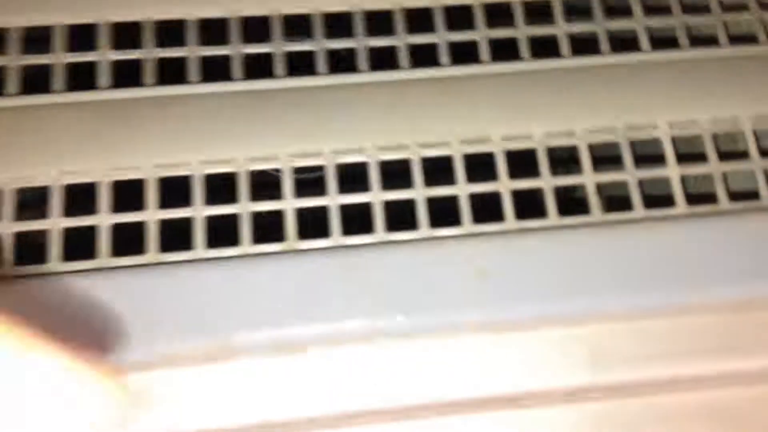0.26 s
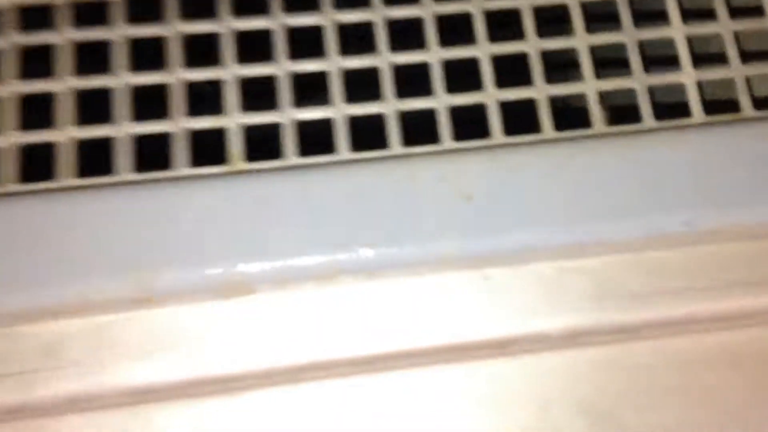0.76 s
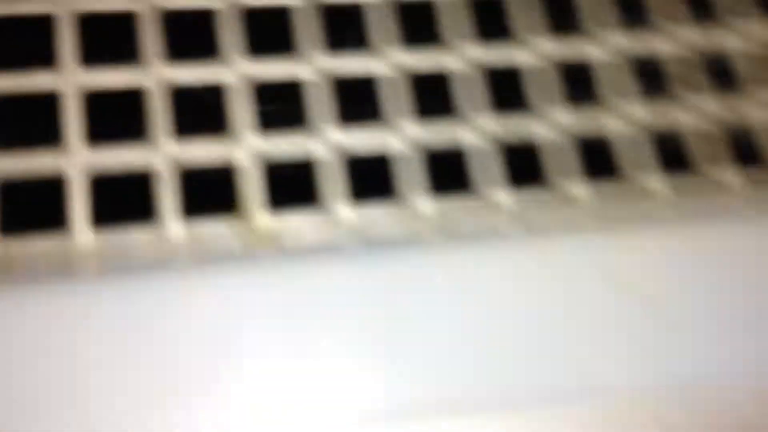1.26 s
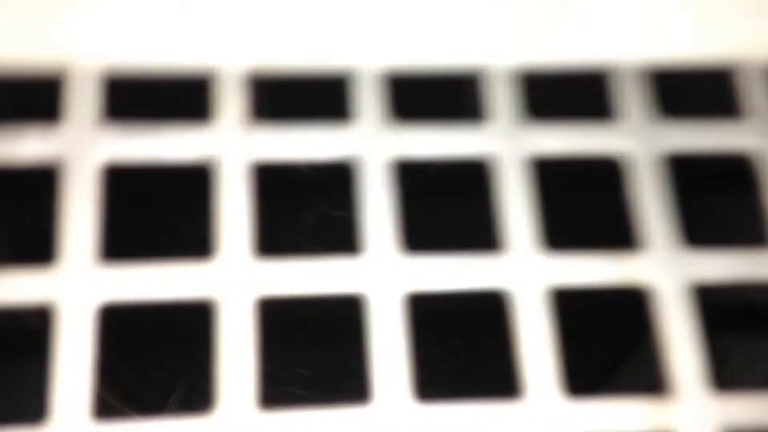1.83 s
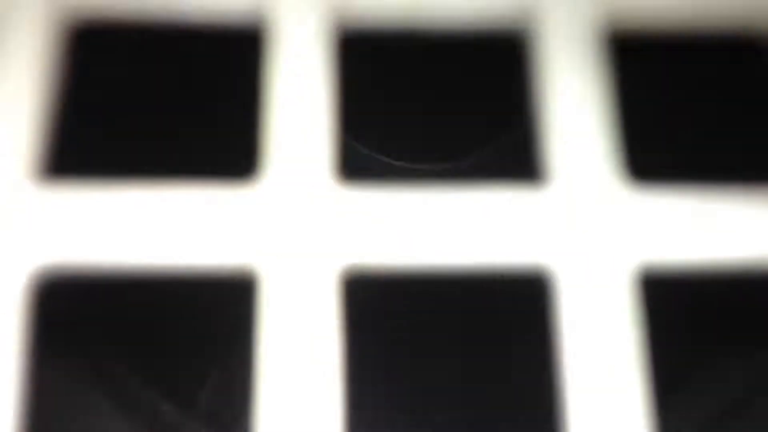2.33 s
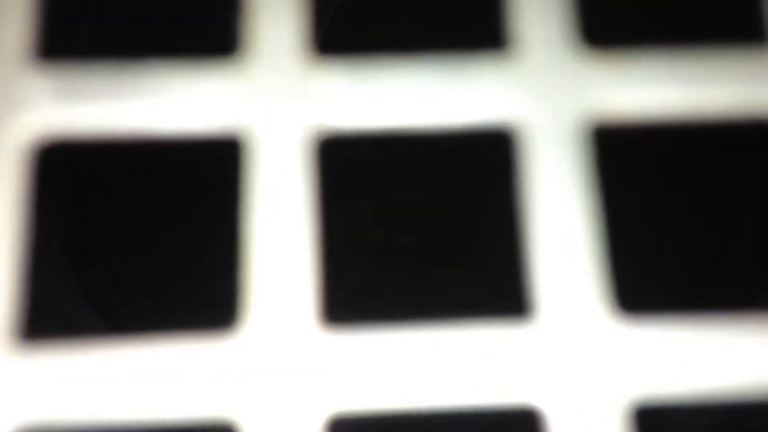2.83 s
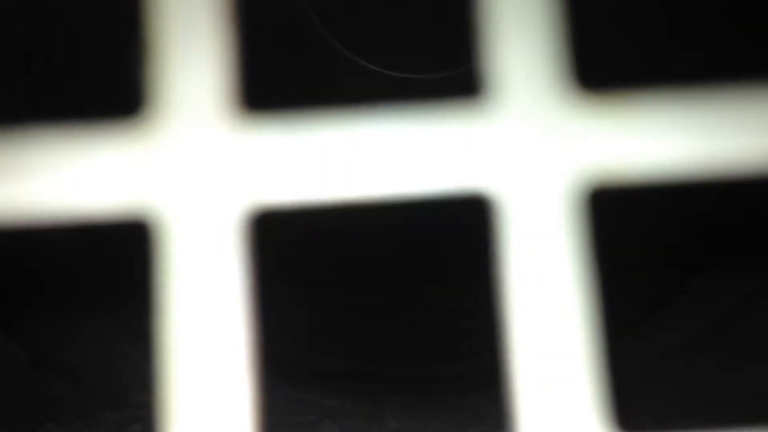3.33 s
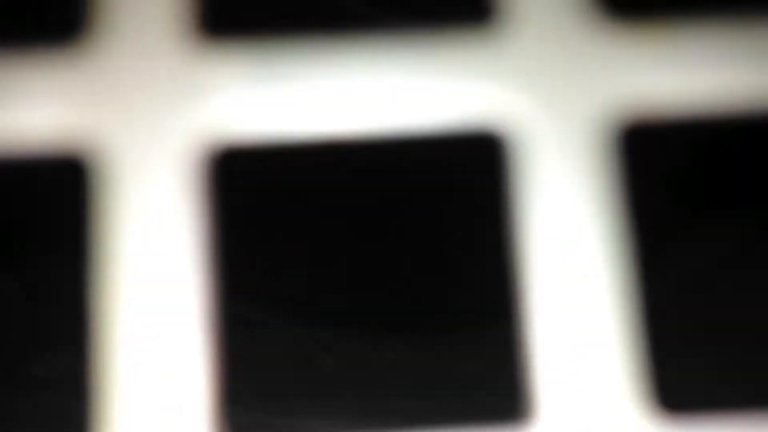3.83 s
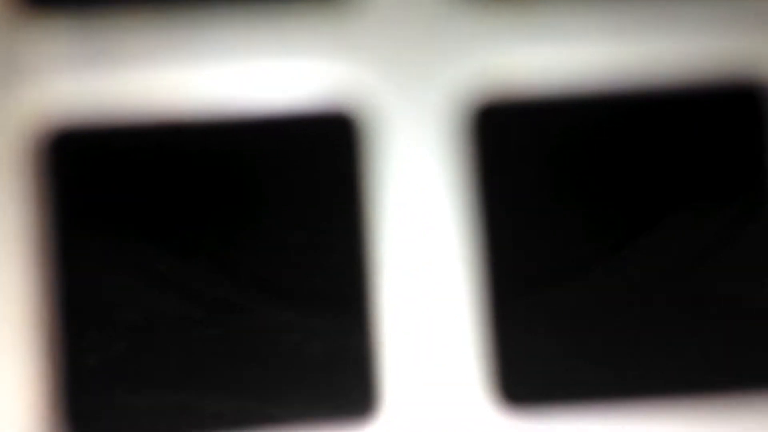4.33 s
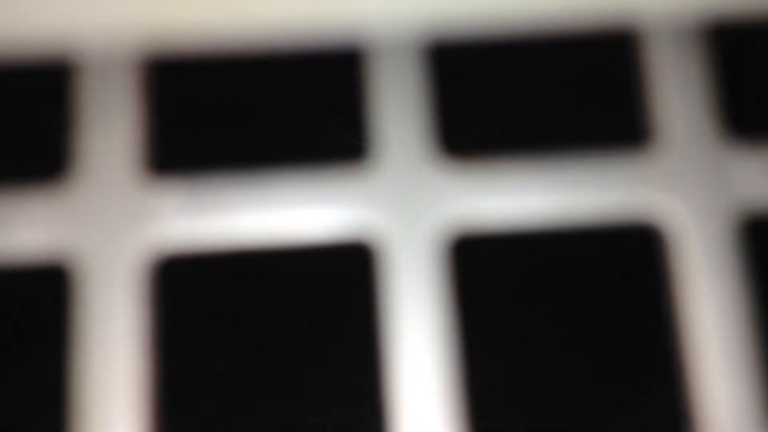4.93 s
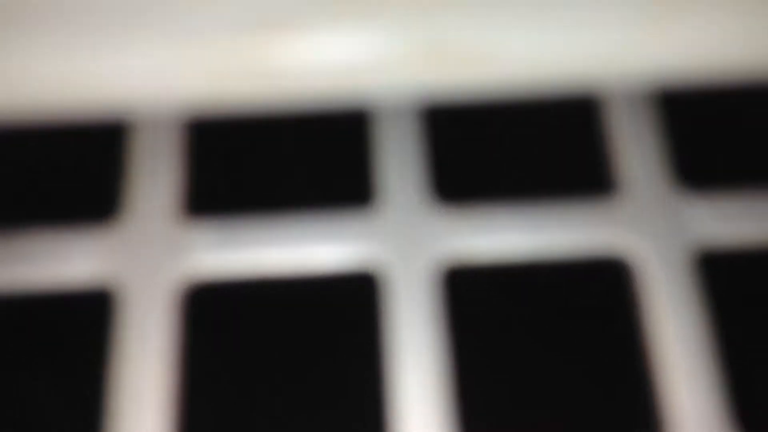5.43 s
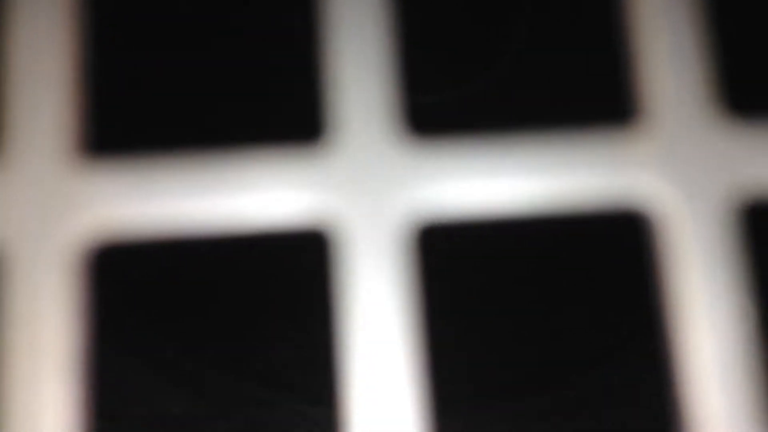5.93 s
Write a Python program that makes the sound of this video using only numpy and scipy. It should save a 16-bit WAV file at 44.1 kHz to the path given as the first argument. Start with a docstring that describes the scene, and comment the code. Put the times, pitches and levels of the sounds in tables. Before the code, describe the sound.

Two large exhaust fans roar and hum with a thin whine, then their airflow buffets the microphone with rumbling, crackling gusts.

```python
"""At a louvred grille with two large exhaust fans running behind it.
From a step back: a steady roar of air, a hum in the duct, thin motor tones and a high whine.
After a second the microphone moves up to the grille and into the outflow, where eddies buffet it:
gusting noise, rumble, a hollow note, snaps, short rips and low thumps.
A limiter holds down the strongest buffets."""
import sys
import numpy as np
from scipy import signal
from scipy.fft import rfft, irfft
from scipy.io import wavfile
from scipy.ndimage import uniform_filter1d, minimum_filter1d

SR = 44100
rng = np.random.default_rng(int(sys.argv[2]) if len(sys.argv) > 2 else 0)


def int16_out(signal):
    """Quantize to a 16-bit WAV file."""
    q = np.round(np.clip(np.atleast_2d(signal).T, -1, 1) * 32767)
    wavfile.write(sys.argv[1], SR, q.astype(np.int16))


N = 272538
T = np.arange(N) / SR
HZ = np.fft.rfftfreq(N, 1 / SR)


def amp(db):
    """Decibels to gain."""
    return 10 ** (np.asarray(db) / 20)


def unit(x):
    """Scales to rms 1."""
    return x / np.sqrt(np.mean(x ** 2) + 1e-20)


def curve(rows, column=1):
    """One column of a table, joined by straight lines in time."""
    rows = np.asarray(rows)
    return np.interp(T, rows[:, 0], rows[:, column])


def colour(points):
    """Gain at every frequency from a few (Hz, dB) points."""
    hz, db = np.transpose(points)
    return amp(np.interp(np.log(HZ + 1), np.log(hz + 1), db))


def noise(gain):
    """Noise of rms 1 with the given spectral shape."""
    return unit(irfft(rfft(rng.standard_normal(N)) * gain, N))


def drift(rate_hz):
    """A smooth random signal that changes up to about the given rate."""
    return noise(1 / (1 + (HZ / rate_hz) ** 2) / (1 + (HZ / (10 * rate_hz)) ** 2))


def steady(x, size):
    """Evens out the level of a noise over about size samples."""
    return x / np.sqrt(uniform_filter1d(uniform_filter1d(x ** 2, size), size) + 1e-6)


def resonance(hz, width_hz):
    """The spectrum of a resonance with peak gain 1."""
    return 1 / (1 + ((HZ - hz) / width_hz) ** 2)


def resonate(x, hz, width_hz):
    """Passes x through a resonance that follows the curve hz."""
    carrier = np.exp(2j * np.pi * np.cumsum(hz) / SR)
    pole = np.exp(-np.pi * width_hz / SR)
    return 2 * (carrier * signal.lfilter([1 - pole], [1, -pole], x / carrier)).real


def swell(peak_s, half_length_s, rise=1):
    """A smooth bump; rise below 1 quickens the attack and draws out the fall."""
    out = np.zeros(N)
    near = slice(*np.searchsorted(T, [peak_s - .1, peak_s + .1]))
    u = (T[near] - peak_s) / half_length_s
    out[near] = np.exp(-np.where(u < 0, u / rise, u * rise) ** 2)
    return out


def snap(impulses, leak_hz=400, corner_hz=1700, top_hz=5600):
    """Turns impulses into sudden pressure steps that leak away within a millisecond."""
    leak = 1j * HZ / (1j * HZ + leak_hz)
    shape = leak / (1 + 1j * HZ / corner_hz) ** 2 / (1 + (HZ / top_hz) ** 6)
    return irfft(rfft(impulses) * shape, N) / abs(irfft(shape, N)).max()


# One scuff on the way up to the grille: peak_s, level_db, half_length_s
SCUFF = (1.18, -48, .022)

def scuff():
    """A brief, faint brush of treble."""
    peak_s, level_db, half_length_s = SCUFF
    treble = noise(colour([(2000, -12), (7000, 2), (12000, 0), (15000, -3)]))
    return amp(level_db) * swell(peak_s, half_length_s) * treble


# One digital click in the signal: start_s, level_db
DIGITAL_CLICK = (5.284, -8)

def digital_click(decay_s=0.00067):
    """One thin, sharp digital click that dies away at once."""
    start_s, level_db = DIGITAL_CLICK
    return amp(level_db) * (T >= start_s) * np.exp(-abs(T - start_s) / decay_s)


# The fans as heard along the microphone's path, in relative levels: time_s, roar_db, whine_db
FAN_PATH = [(0, -52.5, -43.5), (0.6, -53, -46), (1.09, -53, -45.5), (1.14, -56, -48), (1.26, -59.5, -52),
            (1.34, -56, -50.5), (1.6, -57.5, -47.5), (2.0, -58, -50.5), (2.45, -61, -48.5),
            (2.85, -61.5, -52), (3.2, -57.5, -48.5), (3.7, -59, -50), (4.15, -61.5, -47.5),
            (4.45, -60.5, -49.5), (5.0, -57.5, -47.5), (5.08, -63, -53.5), (5.5, -57.5, -49.5),
            (5.8, -62.5, -52), (6.18, -66, -54)]

def fans():
    """All that comes from the fans; roar and tones fade as the microphone turns into the grille."""
    reach = amp(curve(FAN_PATH))
    whine_gain = amp(curve(FAN_PATH, column=2))
    tone_gain = (reach / reach[0]) ** 0.92  # the tones fade a little less than the roar
    return whine_gain * whine() + tone_gain * motor_tones() + duct_hum() + reach * roar()


# The whine from a step back and from close to the grille: pitch_hz, width_hz, far_db, close_db
WHINE_LINES = [(11145, 30, -8, -18), (11310, 40, -3, -14), (11375, 35, -12, -7), (11430, 330, 0, -3),
               (11455, 35, -7, -14), (11513, 30, -10, -3), (11680, 70, -13, -9), (11970, 170, -14, -8),
               (12340, 35, -26, -24), (12435, 35, -26, -28)]

def whine(turn_s=3, turn_length_s=.6):
    """Fuzzy high lines, likely the motor drive; their balance shifts as the microphone moves in."""
    band = resonance(11600, 560) ** .5 / (1 + (HZ / 12550) ** 100)
    close = np.clip((T - turn_s) / turn_length_s + .5, 0, 1)
    out = np.zeros(N)
    for pitch_hz, width_hz, far_db, close_db in WHINE_LINES:
        level_db = far_db + (close_db - far_db) * close
        out += amp(level_db) * noise(band * resonance(pitch_hz, width_hz))
    return unit(out)


# The motors behind the grille, from where the microphone starts: pitch_hz, level_db
MOTOR_TONES = [(501, -52), (894, -58), (1028, -54), (1168, -53), (1427, -55), (1690, -52), (2283, -59),
               (3168, -67), (3391, -68), (3957, -64), (4565, -69), (5325, -69), (5626, -70), (5693, -72),
               (6089, -71), (6218, -75), (7603, -76)]

def motor_tones(waver=0.000905, flutter_db=7.0):
    """Thin motor tones, each wavering in pitch and level in its own way."""
    wander, flutter = drift(5.2), np.tanh(drift(1.8))
    out = np.zeros(N)
    for pitch_hz, level_db in MOTOR_TONES:
        shift = rng.integers(N)
        turns = np.cumsum(pitch_hz * (1 + waver * np.roll(wander, shift))) / SR
        level = amp(level_db + flutter_db * np.roll(flutter, shift))
        out += level * np.sqrt(2) * np.sin(2 * np.pi * turns)
    return out


# The duct's hum along the microphone's path: time_s, relative_db
HUM_PATH = [(0, -15), (.15, -24.5), (.27, -17), (.42, -25), (.62, -21), (.73, -17.5), (.86, -32),
            (1.08, -25), (1.25, -38), (2.2, -25.5), (3.3, -26.5), (3.8, -19.5), (4.2, -18.5), (4.55, -22.5),
            (4.9, -19), (5.6, -21.5), (6.18, -26.5)]

def duct_hum(pitch_hz=140, width_hz=30, tone_db=-9.0, boom_db=0.5, throb_db=2.0, throb_hz=7):
    """The blade-passing tone, half buried in air that booms in the duct; it throbs unevenly."""
    turns = np.cumsum(pitch_hz * (1 + .03 * drift(13.4))) / SR
    tone = np.sqrt(2) * np.sin(2 * np.pi * turns)
    level = amp(curve(HUM_PATH) + throb_db * np.tanh(drift(throb_hz)))
    boom = steady(noise(resonance(pitch_hz, width_hz)), size=4000)
    return level * (amp(tone_db) * tone + amp(boom_db) * boom)


# The fans' rush of air in front of the grille: frequency_hz, relative_db
ROAR_COLOUR = [(25, -17), (42, -2), (60, -5), (100, -9.5), (170, 0.5), (300, -11), (480, -45), (750, -21.5),
               (1130, -22), (1290, -24), (1480, -21), (2400, -25.5), (2750, -28), (3400, -30.5),
               (5200, -39), (10500, -50), (12600, -69), (13200, -90), (14000, -115)]
# The notch in the roar as the microphone moves: time_s, centre_hz, depth_share
ROAR_NOTCH = [(0, 2750, 0.4), (1.05, 2850, 0.6), (1.35, 2840, .85), (1.75, 2640, 1), (2.4, 2870, .55),
              (3.0, 2900, 0), (3.35, 2820, 0.4), (3.6, 2050, 0.6), (5.0, 1950, 0.2), (6.18, 1850, 0.1)]

def roar(gain_db=29.5):
    """Broad blade noise; a reflection, likely off the louvres, cuts a moving notch in it."""
    rush = amp(gain_db) * noise(colour(ROAR_COLOUR))
    return rush - curve(ROAR_NOTCH, column=2) * resonate(rush, curve(ROAR_NOTCH), width_hz=440)


# The microphone crosses the gusty edge of the outflow into its core:
# time_s, strength_db, brightness_db, gustiness_db
FLOW_PATH = [(0, -32, -10, 8), (.22, -32.5, -16, -1.5), (.4, -32.5, -9, 0), (.72, -35.5, -3, 3),
             (.84, -26.5, -14, 2), (.94, -30, -14, 8.5), (1.01, -35.5, -4, -2), (1.15, -31.5, -13, -0.5),
             (1.21, -25, -17, 4), (1.5, -27, -13.5, 5), (1.72, -35.5, -2.5, 3), (1.86, -24.5, -9.5, 5),
             (2.16, -25, -6.5, 3), (2.27, -20.5, -10.5, 4.5), (2.4, -23, -6, 2), (2.6, -22, -9, 2.5),
             (2.92, -22.5, -9, -0.5), (3.02, -17.5, -12.5, 0.5), (3.15, -19, -10.5, 2.5),
             (3.3, -22, -9, 1.5), (3.52, -21.5, -12, 4.5), (3.72, -19.5, -9, -1.5), (3.95, -23, -6.5, 0),
             (4.2, -20.5, -6, 2.5), (4.45, -23.5, -9, 0.5), (4.82, -23, -8, 0), (5.02, -23, -9.5, 1.5),
             (5.2, -23.5, -8, 3.5), (5.55, -23.5, -7, -1.5), (5.78, -23, -9, 7), (6.0, -27, -4.5, 2.5),
             (6.18, -25.5, -5, 3)]

def airflow(gust_hz=22.5, lull_db=1.0, lull_lead_s=.011, lull_half_s=.006):
    """The flow's strength, gusts and brightness in dB; it surges at random and slackens before rips."""
    lulls = sum(swell(crest_s - lull_lead_s, lull_half_s) for crest_s, *_ in RIPS)
    surges_db = curve(FLOW_PATH, column=3) * unit(np.tanh(1.9 * drift(gust_hz)))
    gust_db = surges_db - lull_db * (np.minimum(lulls, 1) - np.mean(lulls))
    return curve(FLOW_PATH) + gust_db, gust_db, curve(FLOW_PATH, column=2)


# A hollow note, strongest with the microphone at the outflow's edge: time_s, level_over_flow_db
HOLLOW_PATH = [(0, -6), (1.1, -15), (1.45, 0.5), (2.3, -15.5), (3.08, -9), (3.3, -13), (6.18, -34)]

def hollow_note(strength_db, pitch_hz=524, width_hz=167, wander=0.17, eddy_hz=45, eddy_db=3):
    """The wind hoots faintly in one broad resonance whose pitch wanders."""
    hz = pitch_hz * (1 + wander * np.tanh(drift(9)))
    note = resonate(resonate(rng.standard_normal(N), hz, width_hz), hz, width_hz)
    gusting = unit(amp(eddy_db * drift(eddy_hz)))
    return amp(strength_db + curve(HOLLOW_PATH)) * unit(note) * gusting


def spits(vigour_db, per_s=70, gain_db=-15.0):
    """Countless small snaps on the microphone, more and louder in strong, bright flow."""
    vigour = amp(vigour_db)
    chance = per_s * unit(vigour) ** 2 / SR
    impulses = rng.choice([-1, 1], N) * (rng.random(N) < chance)
    return amp(gain_db) * vigour * unit(snap(impulses))


# Wind rumble on the microphone: frequency_hz, relative_db
RUMBLE_COLOUR = [(10, -27), (25, -43), (40, -8), (60, 11.5), (100, 10), (140, -5.5), (220, -5.5),
                 (500, -73)]
# The rumble along the path, strongest close to the grille: time_s, level_db
RUMBLE_PATH = [(0, -34), (1.0, -26.5), (1.7, -30.5), (3.44, -25), (3.58, -21), (4.4, -23), (4.95, -18.5),
               (6.18, -21)]

def rumble(gust_db, eddies, eddy_db=-0.9):
    """Slow, large eddies rumble; the level rises with each gust and dips a little at each fast eddy."""
    bass = noise(colour(RUMBLE_COLOUR)) * unit(amp(eddy_db * eddies))
    return amp(curve(RUMBLE_PATH) + gust_db) * bass


# Wind noise right on the microphone: frequency_hz, relative_db
BUFFET_COLOUR = [(60, -44), (120, -5.5), (190, 4.5), (300, -1), (570, -4.5), (1000, -13), (1800, -22.5),
                 (3200, -35.5), (5500, -52), (9000, -54), (13000, -95)]

def buffeting(strength_db, bright_db, eddies, gain_db=4.0, eddy_db=3.0, usual_bright_db=-6.0):
    """Turbulence on the microphone: each eddy swells the noise, and bright flow lifts its treble."""
    air = rfft(noise(colour(BUFFET_COLOUR)))
    octave = np.clip(np.log2((HZ + 1) / 400), -2, 4)
    tilt_db = 0.74 * (bright_db - usual_bright_db)  # per octave, over the two octaves above 400 Hz
    out = np.zeros(N)
    for k in range(-2, 5):
        band = irfft(air * np.maximum(1 - abs(octave - k), 0), N)
        out += band * amp(np.clip(k, 0, 2) * tilt_db)
    return amp(strength_db + gain_db) * unit(amp(eddy_db * eddies)) * out


# Large eddies that strike the microphone: start_s, relative_db, pitch_hz
THUMPS = [(0.259, 3, 143), (0.77, 0, 143), (0.941, -4, 202), (1.094, 6.5, 142), (1.192, 1, 204),
          (1.227, -1.5, 263), (1.508, -2.5, 394), (1.563, -1, 102), (1.575, 3, 620), (1.619, -9, 190),
          (1.778, -1, 490), (1.84, 3, 237), (1.907, 4.5, 220), (2.115, -0.5, 151), (2.264, -1.5, 196),
          (2.274, 10, 192), (2.323, -2.5, 93), (3.436, -2, 790), (3.443, -7, 210), (3.555, -1.5, 76.6),
          (4.398, 3, 330), (5.283, -3.5, 219), (5.603, 3, 152), (5.943, 1, 258), (6.029, 0.5, 324)]

def thumps(gain_db=-5.0, rise_cycles=0.78):
    """A large eddy swings the pressure to and fro once or twice."""
    out = np.zeros(N)
    for (start_s, relative_db, pitch_hz), phase in zip(THUMPS, rng.random(len(THUMPS))):
        turns = np.clip((T - start_s) * pitch_hz, 0, 20)
        age = turns / rise_cycles
        envelope = (age * np.exp(1 - age)) ** 2
        out += amp(relative_db) * envelope * np.sin(2 * np.pi * (turns + phase))
    return amp(gain_db) * out


# A rip's body and the fizz at its crest, right on the microphone: frequency_hz, relative_db
RIP_COLOUR = [(60, -3), (230, 15), (600, 5.5), (1500, -9), (2300, -21), (3500, -33), (6000, -59),
              (13000, -95)]
FIZZ_COLOUR = [(300, -26), (850, 10.5), (1500, 10), (2000, 4), (3000, -3), (4500, -19.5), (6500, -49),
               (10000, -40), (13500, -100)]
# Small fast eddies tearing past the microphone, in relative levels:
# crest_s, body_db, half_length_s, crest_db
RIPS = [(0.039, -21, 0.0023, -41), (0.11, -19, 0.002, -42), (0.24, -16.5, 0.0033, -44),
        (0.84, -24, 0.0043, -40), (1.281, -21, 0.0069, -42), (1.312, -15.5, 0.0027, -25.5),
        (1.38, -17.5, 0.0039, -34), (1.441, -27, 0.0023, -44), (1.473, -21, 0.0021, -40),
        (1.578, -13, 0.0067, -29), (1.624, -27, 0.0025, -48), (1.662, -19, 0.0045, -42),
        (1.78, -18.5, 0.0067, -40), (1.789, -23, 0.0017, -33), (1.853, -20, 0.0021, -22),
        (1.915, -15, 0.0036, -28), (1.929, -12.5, 0.0056, -20), (1.938, -20, 0.0045, -42),
        (1.986, -16, 0.0023, -40), (1.994, -23, 0.0017, -39), (2.047, -25, 0.0022, -37),
        (2.09, -12, 0.0066, -19.5), (2.099, -16, 0.0016, -13.5), (2.151, -22, 0.0036, -26),
        (2.231, -16, 0.0053, -26), (2.25, -18, 0.008, -15), (2.295, -7, 0.0011, -15),
        (2.334, -23, 0.003, -21.5), (2.359, -18, 0.0011, -20), (2.515, -11, 0.003, -24),
        (2.538, -13, 0.0026, -19), (2.582, -31, 0.0024, -25), (2.624, -20, 0.0048, -22.5),
        (2.714, -32, 0.0031, -14.5), (2.732, -14.5, 0.0049, -17), (2.816, -29, 0.001, -20),
        (2.907, -18, 0.0018, -16), (2.918, -15, 0.0036, -25), (3.007, -19, 0.0035, -23),
        (3.052, -14, 0.0044, -28), (3.072, -10, 0.0013, -35), (3.122, -16, 0.0037, -30),
        (3.175, -15, 0.0033, -26), (3.216, -13, 0.0024, -34), (3.224, -7.5, 0.002, -18),
        (3.267, -33, 0.0033, -26), (3.352, -14, 0.0073, -17), (3.4345, -13, .002, -8),
        (3.4395, -12, .0032, -9), (3.539, -15, 0.0023, -34), (3.566, -15.5, 0.0027, -35),
        (3.642, -11, 0.0019, -37), (3.7, -14, 0.002, -17), (3.72, -9, 0.0027, -26),
        (3.732, -17, 0.0033, -20), (3.745, -16, .003, -27), (3.842, -16.5, 0.0025, -26),
        (3.857, -11, 0.0037, -32), (3.872, -5, 0.0025, -12), (3.995, -12, 0.0046, -16),
        (4.05, -12, 0.0026, -44), (4.101, -11, 0.0067, -19), (4.117, -13, 0.0024, -18),
        (4.177, -15, 0.0046, -34), (4.217, -18, 0.002, -30), (4.23, -10, 0.0066, -25),
        (4.242, -8, 0.0013, -28), (4.331, -8, .002, -24), (4.397, -17.5, 0.0063, -20.5),
        (4.482, -8.5, 0.0018, -16.5), (4.522, -8, 0.0031, -32), (4.544, -14, .003, -32),
        (4.608, -18, 0.0037, -21), (4.644, -6, 0.0014, -32), (4.685, -15.5, 0.0069, -23),
        (4.731, -11.5, 0.0036, -19), (4.784, -9, 0.005, -25), (4.898, -11.5, 0.0026, -24),
        (4.923, -8, 0.0014, -25), (5, -12, 0.0022, -35), (5.037, -10.5, 0.0054, -28),
        (5.295, -16.5, 0.0093, -27), (5.358, -21, 0.0026, -32), (5.438, -13, 0.0027, -18.5),
        (5.587, -13, 0.0029, -31), (5.618, -15, 0.0093, -25), (5.709, -15.5, 0.0045, -16),
        (5.723, -9, 0.0011, -20), (5.751, -13, 0.0045, -11.5), (5.759, -22, 0.001, -14),
        (5.766, -16, 0.0013, -15), (5.799, -7.5, 0.00068, -29), (5.878, -19.5, 0.0042, -17.5),
        (5.956, -12, 0.011, -26), (5.994, -16.5, 0.0022, -14.5), (6.034, -19, 0.0028, -27),
        (6.118, -13.5, 0.0037, -23), (6.154, -19, 0.0067, -19)]

def rips(body_gain_db=1.5, fizz_gain_db=-5.5, snap_gain_db=2.0, crest_cap_db=-15, grain_db=2.0):
    """Bursts of turbulence that swell and die in milliseconds; sharp ones fizz and snap at the crest."""
    body, fizz, crests = np.zeros((3, N))
    signs = rng.choice([-1, 1], len(RIPS))
    for (crest_s, body_db, half_length_s, crest_db), sign in zip(RIPS, signs):
        shape = swell(crest_s, half_length_s, rise=0.75)
        body += amp(body_db + body_gain_db) * shape
        fizz += amp(crest_db + fizz_gain_db) * shape
        # the hardest rips fizz more but snap no louder
        crests[round(crest_s * SR)] = amp(min(crest_db, crest_cap_db)) * sign
    grain = unit(amp(grain_db * np.tanh(2 * drift(390))))
    tearing = steady(noise(colour(RIP_COLOUR)), size=150)
    fizzing = steady(noise(colour(FIZZ_COLOUR)), size=110)
    return grain * (body * tearing + fizz * fizzing) + amp(snap_gain_db) * snap(crests)


def scene():
    """Fans behind the grille, and their outflow on one microphone."""
    strength_db, gust_db, bright_db = airflow()
    eddies = unit(np.tanh(1.8 * drift(rate_hz=60)))
    wind = buffeting(strength_db, bright_db, eddies) + rumble(gust_db, eddies) + hollow_note(strength_db)
    hits = rips() + spits(strength_db + bright_db) + thumps()
    return (scuff() + digital_click() + fans() + wind + hits)[None]


def record(dry, bass_cut_hz=42, ceiling_db=-3.0, recovery_db_per_s=250, top_hz=15780):
    """The microphone sheds deep bass, a fast limiter ducks the hardest buffets, a low-pass follows."""
    heard = irfft(rfft(dry) / np.sqrt(1 + (bass_cut_hz / (HZ + 1)) ** 4), N)
    over_db = np.maximum(20 * np.log10(abs(heard[0]) + 1e-9) - ceiling_db, 0)
    ahead_db = -minimum_filter1d(-over_db, size=65)  # the limiter sees each peak coming
    recovery_db = T * recovery_db_per_s
    held_db = np.maximum.accumulate(ahead_db + recovery_db) - recovery_db
    duck_db = uniform_filter1d(uniform_filter1d(held_db, size=45), size=21)
    lowpass = signal.firwin(511, top_hz, window=("kaiser", 9), fs=SR)
    return signal.oaconvolve(heard * amp(-duck_db), lowpass[None], "same")


dry = scene()
out = record(dry)
int16_out(out)
```